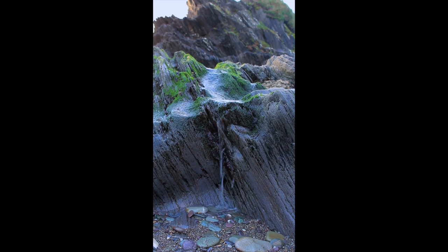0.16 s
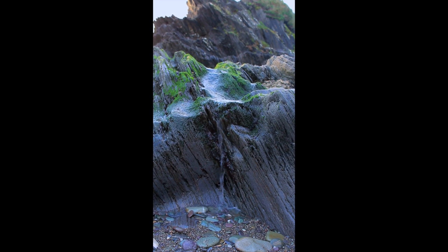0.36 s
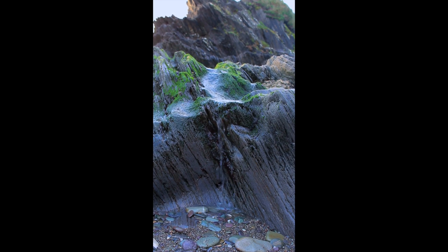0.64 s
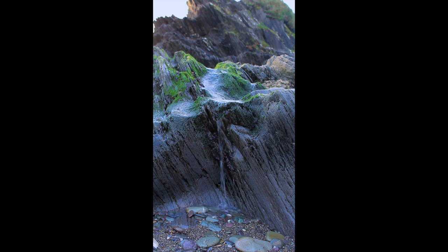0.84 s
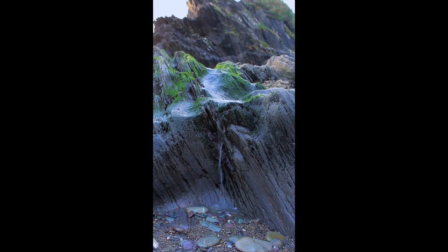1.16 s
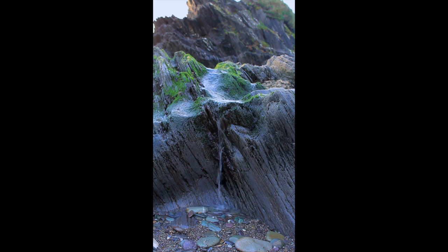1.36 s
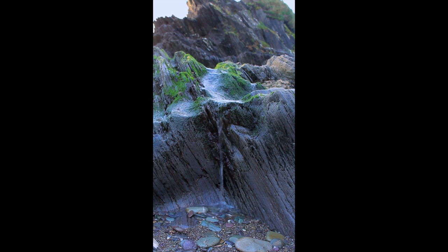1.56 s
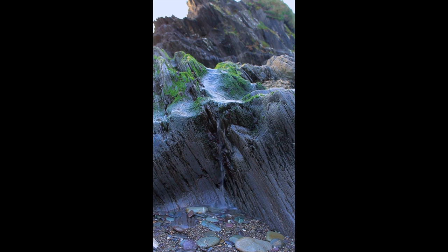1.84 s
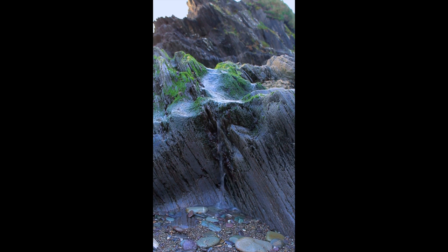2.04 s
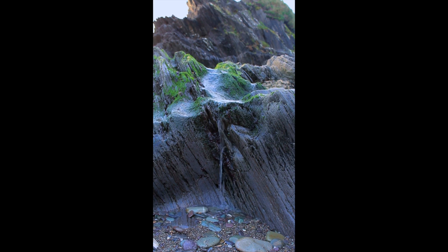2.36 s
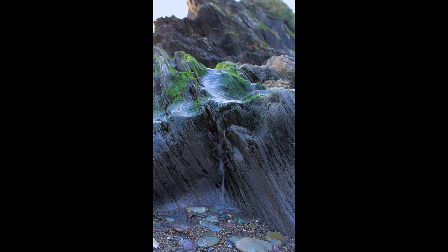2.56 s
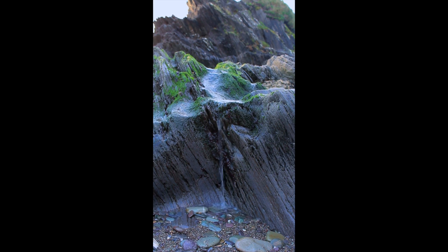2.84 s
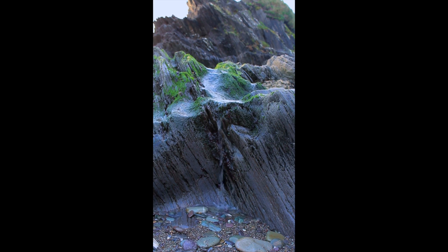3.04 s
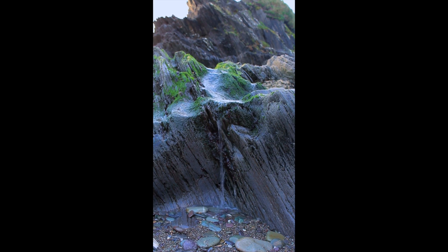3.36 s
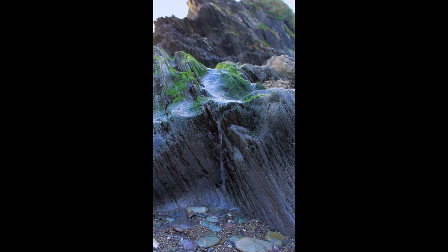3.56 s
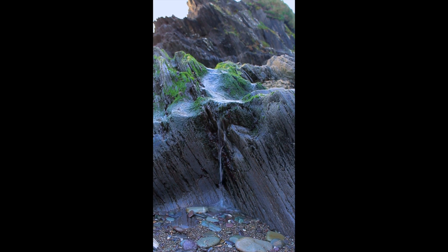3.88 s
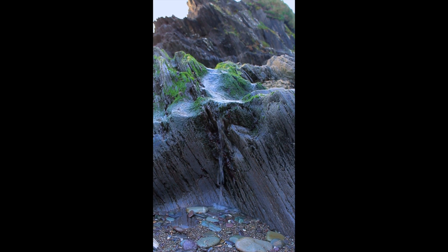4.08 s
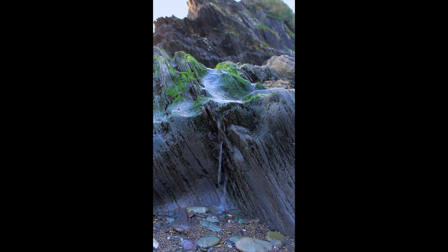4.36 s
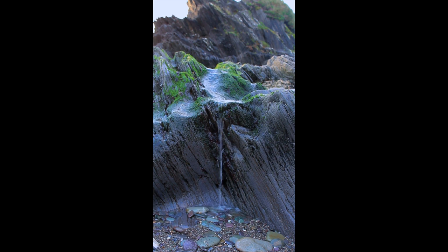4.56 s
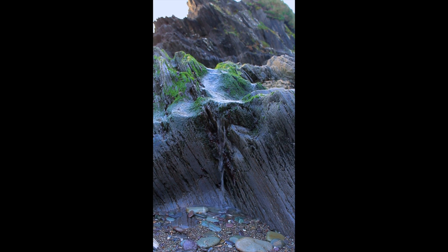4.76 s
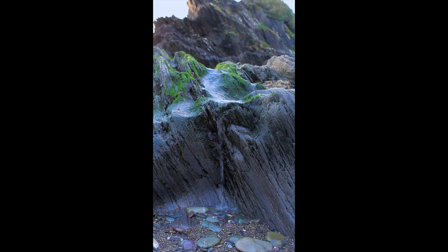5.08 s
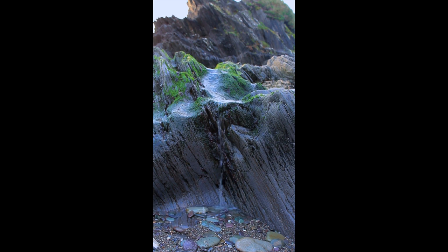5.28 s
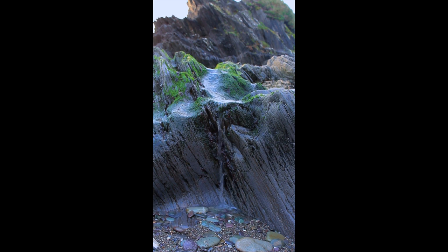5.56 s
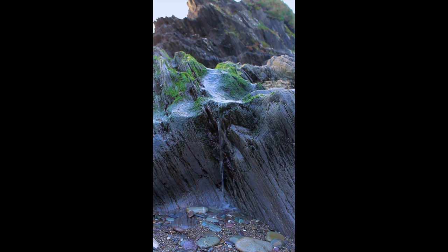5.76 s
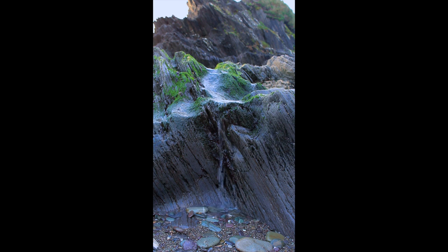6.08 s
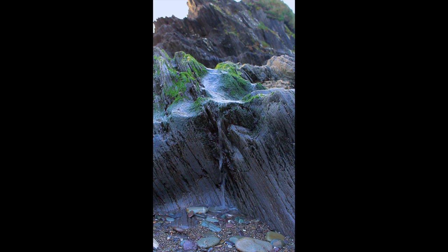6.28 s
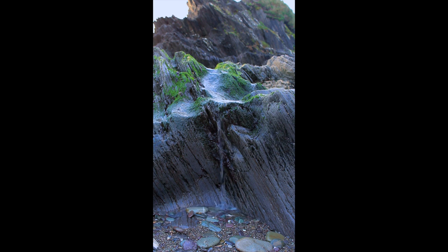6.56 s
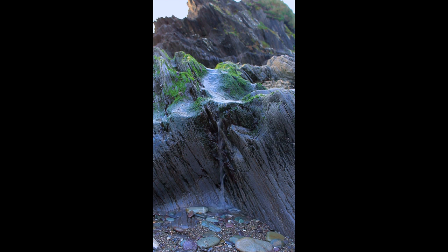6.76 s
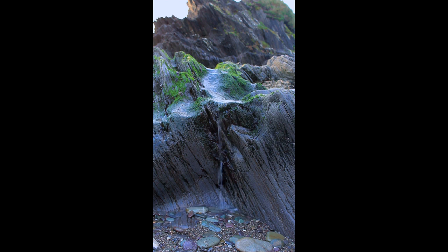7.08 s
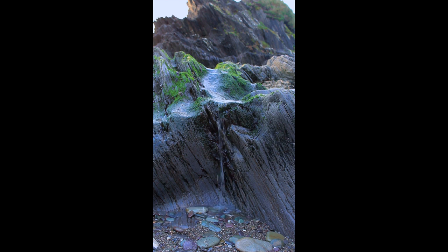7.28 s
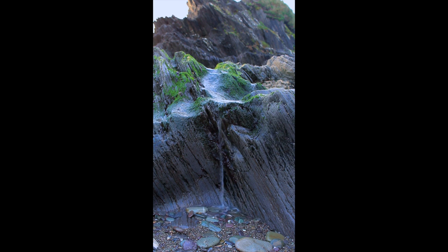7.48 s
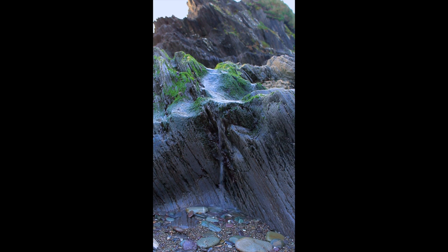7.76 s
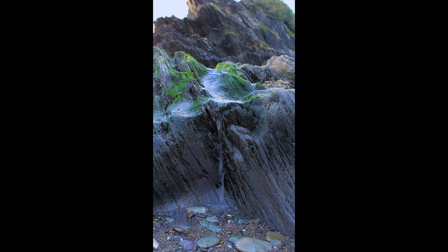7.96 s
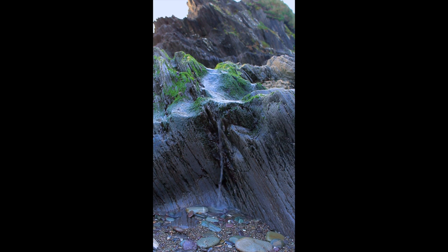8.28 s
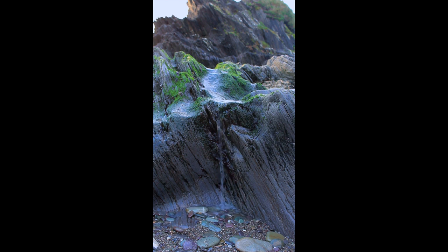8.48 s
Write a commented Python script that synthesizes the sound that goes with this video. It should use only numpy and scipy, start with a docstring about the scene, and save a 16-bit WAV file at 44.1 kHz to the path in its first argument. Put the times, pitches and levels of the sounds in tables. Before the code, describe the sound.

A thin trickle falls down a rock face and spatters on wet pebbles close to the microphone. Irregular, rapid bright plinks and clicks overlap with fine fizzing spray and a very short echo from the rock hollow. Distant surf rumbles softly behind, gradually fading. Around seven seconds pebbles grind and knock nearby for about a second, while the dripping carries on to the end.

```python
"""On a pebble beach, a thin stream runs down a rock face and spatters on wet pebbles close to one microphone.
Each drop traps tiny bubbles, made as short ringing tones; the hollow under the rock throws them back as a tail.
Every landing adds a snap of hiss and a short spray of tiny rings, over a finer spatter.
Surf, made of random spectra, rumbles far off along the beach.
Once the pebbles grind and shift nearby, as crowds of short knocks."""
import sys
import numpy as np
from scipy import signal
from scipy.fft import rfft, irfft
from scipy.io import wavfile
from scipy.ndimage import uniform_filter1d

SR = 44100
rng = np.random.default_rng(int(sys.argv[2]) if len(sys.argv) > 2 else 0)


def transcribe(signal):
    """Save signal, clipped to [-1, 1], as a 16-bit WAV file at the path in sys.argv[1]."""
    frames = np.atleast_2d(signal).T
    limited = np.clip(frames, -1, 1)
    pcm = np.round(limited * 32767).astype(np.int16)
    wavfile.write(sys.argv[1], SR, pcm)


def to_linear_factor(level_db):
    """Convert decibel levels (scalar or array-like) to linear amplitude factors."""
    exponent = np.asarray(level_db, float) / 20
    return 10 ** exponent


N = 380583

# The clearest drops, each with two bubbles and a spray; levels are relative, before the trims in the functions:
# (time of the peak [s], main bubble's level [dB], its pitch [Hz],
#  second bubble's level [dB], its pitch [Hz], level of the spray after it [dB])
DROP_LANDINGS = [(0.0063, -18, 5600, -27, 3920, -36), (0.032, -14, 10400, -45, 7140, -49),
                 (0.0826, -17.5, 5170, -30, 3430, -36), (0.095, -26, 2410, -30, 3000, -41),
                 (0.0999, -15, 6930, -28, 2410, -46), (0.1584, -18, 2500, -34, 6900, -58),
                 (0.259, -20, 7200, -30, 8900, -31), (0.278, -16, 4120, -30, 8010, -28),
                 (0.302, -16, 4200, -17, 5500, -46), (0.3084, -11.5, 3800, -34, 6000, -50),
                 (0.3307, -9, 4170, -14.5, 5560, -48), (0.3764, -19, 8060, -31, 4500, -39),
                 (0.4, -19, 4300, -21, 3510, -42), (0.4087, -11.5, 6870, -21, 3500, -39),
                 (0.417, -7, 4150, -26, 7140, -49), (0.4604, -7.5, 3290, -9.5, 4670, -30),
                 (0.4994, -20, 2100, -33, 3400, -33.5), (0.6012, -18, 6600, -18, 9460, -28.5),
                 (0.6666, -10, 4410, -15, 10070, -33), (0.6824, -18.5, 2820, -25, 3630, -46),
                 (0.7527, -16, 10200, -20.5, 4580, -34), (0.7975, -12.5, 6570, -21, 4470, -30),
                 (0.9014, -12.5, 3500, -44, 2070, -61), (0.9969, -23, 9940, -25, 7950, -42),
                 (1.0959, -15.5, 5860, -19, 3530, -38), (1.2, -14, 4160, -29, 5270, -44),
                 (1.2444, -17, 11150, -30, 6680, -33), (1.2603, -15, 6900, -24, 9430, -48),
                 (1.3251, -20, 9300, -29, 11610, -44), (1.338, -16, 5530, -20, 9800, -33),
                 (1.4156, -17.5, 9800, -39, 5610, -39), (1.473, -9.5, 3520, -37, 6200, -58),
                 (1.5058, -11, 6480, -14, 4030, -49), (1.5376, -18.5, 6550, -18, 11460, -28),
                 (1.5569, -23, 3780, -32, 5310, -46), (1.5745, -18, 6230, -16, 8700, -31),
                 (1.5906, -21, 2730, -23, 2040, -49), (1.6024, -11, 3480, -19, 4700, -49),
                 (1.6372, -16, 3700, -18.5, 4600, -53), (1.6869, -22, 4240, -28, 9980, -30),
                 (1.6995, -19.5, 4510, -25, 6910, -33), (1.7145, -20, 2230, -25, 8000, -32),
                 (1.7475, -19, 3570, -32, 7500, -46), (1.7738, -11, 2950, -22, 5900, -28),
                 (1.7856, -18, 5840, -24, 2850, -31), (1.7964, -18.5, 6700, -17, 2810, -27),
                 (1.835, -10.5, 4420, -19, 7480, -30), (1.8527, -24, 4300, -24, 5850, -49),
                 (1.92, -20, 5800, -24, 9100, -33), (1.935, -24, 4200, -20, 6600, -28),
                 (1.942, -24, 5620, -31, 3530, -37), (1.9552, -23, 6730, -21, 5490, -35),
                 (1.9745, -17, 4340, -18, 8490, -30), (1.981, -11, 5680, -9, 4610, -47),
                 (2.004, -24, 4450, -18, 2520, -54), (2.013, -10.5, 3320, -32, 4820, -53),
                 (2.0275, -9, 4150, -8, 5940, -21), (2.0427, -20, 5270, -24, 3520, -50),
                 (2.0789, -24, 6290, -32, 4300, -54), (2.105, -24, 4310, -30, 6000, -25.5),
                 (2.113, -9, 4650, -18, 9400, -41), (2.1292, -23, 9100, -26, 4390, -35),
                 (2.138, -16, 3960, -25, 7240, -55), (2.179, -18, 6560, -27, 4320, -46),
                 (2.1979, -21, 4790, -25, 3540, -50), (2.2339, -19, 2720, -25, 9140, -34),
                 (2.291, -9, 4260, -13, 3300, -36), (2.311, -16, 3970, -18, 2950, -37),
                 (2.3342, -13, 3530, -13, 9100, -33), (2.3403, -10.5, 3770, -8, 4710, -48),
                 (2.363, -8.5, 3920, -28, 2340, -44), (2.3913, -11, 9690, -13.5, 5520, -41),
                 (2.4062, -20, 4430, -32, 5750, -45), (2.4353, -21, 7200, -30, 3290, -46),
                 (2.4438, -15.5, 4430, -35, 2350, -47), (2.458, -16, 7010, -24, 9000, -38),
                 (2.4782, -21, 3910, -18, 10680, -37), (2.4914, -14.5, 4220, -16, 5450, -33),
                 (2.5039, -8.5, 9270, -22, 4160, -43), (2.5484, -21, 7680, -36, 2530, -44),
                 (2.556, -8, 3970, -25, 6760, -53), (2.7403, -6.5, 6650, -20.5, 8740, -21.5),
                 (2.7703, -8.5, 3520, -16, 7150, -29), (2.7948, -15, 3500, -18, 4160, -39),
                 (2.8646, -13.5, 5870, -20, 7630, -30), (2.8917, -18.5, 2060, -33, 4150, -30),
                 (2.9111, -15, 4730, -20, 8680, -34), (2.9334, -17, 5800, -29, 4510, -40),
                 (2.9487, -6.5, 4700, -14.5, 6450, -52), (2.9658, -20, 4570, -27, 8800, -59),
                 (2.9866, -17.5, 8200, -17.5, 4430, -50), (3.0088, -14, 4190, -12.5, 5790, -49),
                 (3.094, -12, 3600, -13, 6330, -46), (3.1451, -4, 3300, -19, 4280, -35),
                 (3.2051, -25, 2440, -33, 3530, -55), (3.2511, -14, 5770, -37, 7900, -50),
                 (3.2868, -10, 5850, -21, 4590, -54), (3.3, -19, 2080, -33, 5660, -41),
                 (3.3296, -14.5, 2030, -22, 2590, -36), (3.349, -10.5, 6900, -24, 4360, -37),
                 (3.385, -13.5, 7070, -16, 4100, -38), (3.3893, -14.5, 2070, -21, 7210, -51),
                 (3.441, -11, 3800, -21, 6550, -29), (3.499, -14, 3960, -21, 6840, -27),
                 (3.5152, -14, 5400, -18, 6990, -28), (3.535, -15.5, 1980, -21, 4490, -49),
                 (3.549, -25, 2550, -28, 1780, -44), (3.5527, -6, 7150, -25, 5700, -37),
                 (3.569, -16, 6920, -32, 9150, -41), (3.5907, -18.5, 9000, -23, 3110, -31),
                 (3.6034, -9.5, 3670, -23.5, 5500, -45), (3.6146, -18, 2110, -28, 2770, -50),
                 (3.6204, -16, 2350, -28, 5500, -53), (3.7033, -17.5, 1960, -26, 6830, -35),
                 (3.7256, -21, 9280, -19, 7000, -40), (3.7422, -12.5, 4170, -14, 5960, -44),
                 (3.8027, -7.5, 3270, -11, 4130, -37), (3.8163, -10, 6020, -21, 3570, -43),
                 (3.8844, -4, 3390, -35, 5870, -58), (3.9264, -9, 4200, -18, 7770, -23),
                 (3.9355, -19, 4360, -20, 8200, -45), (3.956, -16, 4270, -32, 5760, -41),
                 (3.971, -4.5, 3960, -14, 4950, -33), (3.9767, -5, 3840, -27, 5470, -42),
                 (3.999, -23, 4050, -33, 6590, -34), (4.0438, -21.5, 6900, -21, 10620, -46),
                 (4.1113, -12, 3390, -27, 2090, -50), (4.1479, -16, 3100, -27.5, 4080, -32),
                 (4.1764, -22, 5200, -16, 10800, -37), (4.1868, -11.5, 6650, -14, 4980, -37),
                 (4.2223, -15, 9200, -27, 6510, -32), (4.2477, -7.5, 4100, -13.5, 8070, -19),
                 (4.267, -13.5, 6460, -25, 10680, -43), (4.3333, -8, 3920, -30, 11400, -37),
                 (4.3657, -20.5, 2400, -36, 4330, -58), (4.402, -14, 7500, -29, 9500, -48),
                 (4.45, -20, 4200, -22, 9150, -32), (4.4987, -14.5, 4390, -24, 5780, -28),
                 (4.521, -14, 4160, -18, 8600, -37), (4.5395, -21, 5040, -25, 10800, -44),
                 (4.5533, -28, 4390, -42, 7050, -52), (4.577, -23, 4290, -36, 8660, -50),
                 (4.5924, -22, 6230, -35, 10900, -39), (4.6355, -25, 4940, -26, 6740, -46),
                 (4.6536, -25, 7030, -25, 4200, -28), (4.6695, -7, 4070, -25, 7400, -29),
                 (4.7109, -10.5, 6960, -29, 4890, -48), (4.7253, -9, 3420, -17, 4470, -47),
                 (4.7354, -15, 6260, -14, 4200, -50), (4.751, -22, 6730, -17, 3970, -51),
                 (4.821, -7, 3670, -19.5, 7000, -54), (4.8819, -19, 4720, -37, 6870, -50),
                 (4.8886, -11, 4710, -11, 3810, -51), (4.9073, -16.5, 4100, -35, 1770, -49),
                 (4.9785, -20, 7180, -31, 11200, -31), (5.0096, -24, 9130, -23, 4770, -44),
                 (5.029, -18, 8500, -18, 7010, -34), (5.051, -9.5, 3800, -15, 6900, -25),
                 (5.0775, -18, 4210, -33, 7080, -45), (5.106, -10.5, 4500, -22, 10100, -44),
                 (5.1212, -13, 4200, -19, 8640, -37), (5.1381, -23, 6990, -36, 9570, -49),
                 (5.153, -21, 2870, -21, 7100, -35), (5.1955, -14.5, 6900, -22, 10700, -24.5),
                 (5.2101, -20.5, 4060, -25, 5560, -57), (5.2768, -23, 7550, -26, 3900, -34),
                 (5.3036, -14.5, 2940, -17, 6700, -32), (5.373, -23, 4800, -31, 6550, -34),
                 (5.4035, -18.5, 6340, -20, 8600, -38), (5.5242, -16.5, 5520, -26, 7020, -51),
                 (5.5423, -9, 4770, -40, 10620, -31), (5.5518, -15, 4320, -15, 5680, -31),
                 (5.5614, -16, 5350, -24, 6750, -52), (5.596, -14.5, 6470, -18.5, 4250, -25),
                 (5.6207, -19, 7000, -25, 5600, -37), (5.645, -10.5, 4070, -19, 7720, -39),
                 (5.674, -7.5, 3330, -13, 8860, -33), (5.6845, -17, 5600, -20, 3540, -54),
                 (5.7212, -21, 4230, -33, 5710, -54), (5.7686, -20, 10700, -17, 6950, -44),
                 (5.7755, -17, 5100, -28, 8850, -40), (5.7974, -13.5, 6610, -21, 9770, -44),
                 (5.8043, -19, 8000, -29, 4970, -46), (5.8112, -15, 7160, -31, 4760, -52),
                 (5.8395, -20, 7060, -35, 4170, -39), (5.8665, -24, 7210, -26, 9000, -28),
                 (5.8915, -20, 5740, -21, 4300, -39), (5.9378, -16, 4600, -31, 1830, -42),
                 (5.9533, -12.5, 5480, -14.5, 6940, -24.5), (5.9981, -16, 7130, -35, 1830, -44),
                 (6.013, -18, 4140, -22, 7100, -31), (6.0837, -19.5, 3680, -33, 1950, -60),
                 (6.123, -19, 11500, -20, 4050, -54), (6.1391, -8, 3680, -19, 7970, -50),
                 (6.1963, -19, 2720, -31, 6660, -30), (6.2266, -15.5, 4000, -16, 5030, -23),
                 (6.2633, -18, 4060, -31, 5620, -43), (6.327, -12, 3540, -14.5, 4700, -32),
                 (6.3343, -18.5, 4100, -32, 5700, -48), (6.419, -14, 4350, -29, 1780, -63),
                 (6.5, -16, 6400, -18.5, 4600, -39), (6.5156, -19, 6620, -30, 11470, -49),
                 (6.5361, -15.5, 7470, -18, 11800, -43), (6.555, -12.5, 7400, -32, 3200, -39),
                 (6.5917, -14, 7360, -28, 4290, -28), (6.5978, -14.5, 5780, -11.5, 9300, -29),
                 (6.6625, -24, 2530, -29, 3510, -36), (6.68, -5.5, 4770, -25, 10300, -32),
                 (6.6867, -14.5, 6600, -19, 3540, -51), (6.708, -18, 6260, -31, 2850, -48),
                 (6.761, -18, 4350, -28, 7160, -47), (6.7872, -12, 6020, -23, 3500, -45),
                 (6.8061, -17, 10900, -25, 8800, -49), (6.8178, -23, 5440, -20, 2800, -40),
                 (6.8234, -7, 4900, -23, 3680, -40), (6.8456, -16, 10100, -32, 4700, -25),
                 (6.8622, -17, 4320, -11, 7350, -27), (6.89, -9, 4500, -17, 5960, -37),
                 (6.9027, -16, 5650, -23, 8560, -30), (6.9305, -17, 9150, -18, 6920, -35),
                 (6.9436, -11.5, 3380, -41, 6860, -49), (6.9996, -8, 4480, -13, 3600, -25.5),
                 (7.0184, -13, 3500, -16, 4800, -29), (7.0394, -26, 3740, -26, 10330, -36),
                 (7.136, -16, 4100, -33, 6840, -31), (7.1613, -12, 4880, -16, 8700, -27),
                 (7.1744, -18, 4960, -15, 3430, -35), (7.1823, -5, 3600, -20, 5150, -33),
                 (7.2253, -9, 3520, -18.5, 10300, -21), (7.2523, -16.5, 5900, -22, 3430, -35),
                 (7.2797, -16, 4470, -27, 6760, -33), (7.296, -21, 10300, -22, 5180, -33),
                 (7.3086, -18, 10000, -20, 6100, -29), (7.3325, -18, 7500, -23, 4440, -28),
                 (7.3447, -23, 5540, -30, 7450, -26), (7.4112, -6.5, 5300, -17, 3650, -33),
                 (7.4193, -21, 5350, -19, 3750, -39), (7.4285, -20, 5180, -18, 4100, -41),
                 (7.4417, -16, 4500, -13.5, 3340, -31), (7.46, -9, 6280, -26, 4520, -28),
                 (7.5061, -19, 4760, -27, 3440, -43), (7.514, -21, 5670, -25, 8270, -31),
                 (7.5359, -22, 3730, -24, 8860, -42), (7.5498, -14, 3820, -26, 5080, -44),
                 (7.5797, -24, 7310, -22, 4100, -46), (7.6232, -14, 8770, -26, 5820, -42),
                 (7.6798, -19.5, 7630, -28.5, 5960, -36), (7.7166, -23, 4150, -26, 6900, -43),
                 (7.7509, -13, 7670, -23.5, 5960, -31), (7.7888, -7, 9260, -29, 7300, -48),
                 (7.9818, -13, 3880, -15.5, 2010, -55), (8.0103, -17, 9550, -19, 6800, -38),
                 (8.021, -11, 6950, -29, 3700, -26), (8.041, -23, 2050, -35, 3560, -55),
                 (8.0587, -18, 2170, -28, 3530, -44), (8.075, -16, 6650, -17, 1880, -34),
                 (8.0855, -10.5, 4320, -17, 6750, -27), (8.101, -22, 2300, -18, 1640, -46),
                 (8.1231, -22, 2360, -33, 3970, -54), (8.152, -32, 2290, -35, 1670, -43),
                 (8.163, -19, 7240, -19.5, 4330, -28), (8.216, -20, 4200, -23, 5500, -37),
                 (8.2773, -20, 1860, -23, 7110, -33), (8.2934, -12.5, 9700, -24, 7200, -34),
                 (8.3435, -18, 7000, -31, 2150, -45), (8.379, -26, 2420, -26, 8930, -50),
                 (8.4761, -6.5, 4100, -15, 5350, -43), (8.513, -17, 4050, -31, 2930, -53),
                 (8.5227, -17, 9100, -25, 3960, -52), (8.557, -23.5, 3940, -26, 10330, -43),
                 (8.5735, -9, 4570, -16.5, 8700, -50), (8.6064, -6.5, 3780, -35, 2680, -52),
                 (8.6127, -10, 3780, -21, 4740, -44)]


def evened(x):
    """Scales a sound to an rms (average strength) of 1."""
    return x / np.sqrt(np.mean(x ** 2) + 1e-20)


def read(points, hz):
    """Reads a spectrum table at the given frequencies, on a log-frequency axis."""
    f, value = np.transpose(points)
    return np.interp(np.log(hz + 1), np.log(f + 1), value)


def level(rows, t, axis=1):
    """Reads one column of a curve at times t, with straight lines between its points."""
    rows = np.asarray(rows)
    return np.interp(t, rows[:, 0], rows[:, axis])


def add(mix, s, sound):
    """Mixes a sound in at s seconds."""
    part = mix[max(round(s * SR), 0):][:len(sound)]
    part += sound[:len(part)]


def ring(hz, cycles, glide, phase):
    """A tone of rising pitch that swells for the given cycles, then dies a little slower; envelope peak 1."""
    # u is time counted in swells: the peak is at 1, the end at 3
    u = np.arange(int(3 * cycles * SR / hz) + 2) * hz / SR / cycles
    envelope = (u * np.exp(1 - u)) ** 2.5
    turns = cycles * u * (1 + glide * (u - 2)) + phase
    return envelope * np.sin(2 * np.pi * turns)


def grains(pitches, per_s, spread_db, ms, glide, count=40):
    """Rings of many pitches, set off at random, a few large; two rows: under and over 1150 Hz. ms: swell time."""
    size = to_linear_factor(spread_db * np.minimum(rng.exponential(1, N), 4))
    size = size * (rng.random(N) < per_s / SR)  # zero where no ring starts
    which = rng.integers(0, count, N)
    phase = rng.random(count)
    out = np.zeros((2, N))
    for k, hz in enumerate(np.geomspace(pitches[0][0], pitches[-1][0], count)):
        tone = to_linear_factor(read(pitches, hz)) * ring(hz, ms * hz / 1000, glide, phase[k])
        starts = np.flatnonzero(size * (which == k))
        places = starts[:, None] + np.arange(len(tone))
        copies = np.outer(size[starts], tone)
        out[int(hz > 1150)] += np.bincount(places.ravel(), copies.ravel(), N)[:N]
    return evened(out)


def lumps(per_s, ms):
    """An uneven envelope of rms 1: random bursts that start suddenly and die away."""
    starts = rng.exponential(1, N) * (rng.random(N) < per_s / SR)
    return evened(signal.lfilter([1], [1, -np.exp(-1000 / (ms * SR))], starts))


def drops():
    """Each drop rings two bubbles, and each sheds two weaker ones; also marks the landings by strength."""
    bubbles = []
    for s, *pair, spray in DROP_LANDINGS:
        for db, hz in (pair[:2], pair[2:]):
            bubbles.append((s, db, hz))
    out, landings = np.zeros(N), np.zeros(N)
    chance = rng.random((len(bubbles), 3, 4))
    for (s, db, hz), family in zip(bubbles, chance):
        rise = np.clip(.0011 - .00003 * (db + 9.5), .0004, .003)  # seconds; hard hits burst sooner
        add(landings, s - rise, to_linear_factor([0.93 * db]))  # louder bubbles splash more, but not in proportion
        for k, (turn, size, late, off) in enumerate(family):
            shed = min(k, 1)  # 0 for the bubble itself, 1 for the two it sheds
            pitch_hz = hz * (1 + 0.31 * shed * (off - .5))
            span = rise * (0.82 + .3 * size)  # swell time in seconds
            weaker_db = shed * (13.5 + 3.7 * size)
            delay = shed * (0.0049 + 0.026 * late)
            tone = to_linear_factor(db - 0.42 - weaker_db) * ring(pitch_hz, span * pitch_hz, glide=0.014, phase=turn)
            add(out, s - span + delay, tone)
    return out, landings


def splash(landings):
    """A broad snap of hiss as each drop bursts on stone, dying within a few milliseconds."""
    # colour of the hiss: (frequency [Hz], relative level [dB per Hz])
    splash_colour = [(1500, 6), (2800, -9.5), (4500, 5), (7000, -7), (10000, -3), (12500, -11.5),
                     (15500, -35)]
    t = np.arange(SR // 20) / SR
    snap = np.minimum(t / 0.001, 1) * to_linear_factor(-60 * t / 0.018)  # 1 ms rise, 60 dB down by 18 ms
    burst = signal.oaconvolve(landings, snap)[:N]
    colour = to_linear_factor(read(splash_colour, np.fft.rfftfreq(N, 1 / SR)))
    hiss = irfft(rfft(rng.standard_normal(N)) * colour, N)
    return to_linear_factor(-17.0) * burst * evened(hiss)


def spatter(landings):
    """Fine fizz around the clear drops and in each spray, and small separate drips between them."""
    # fine spatter between the clear drops, before the 3 dB cut and the mixing weights: (time [s], level [dB])
    spatter_curve = [(0.0, -42.5), (0.88, -44), (1.2, -38), (1.45, -46.5), (1.7, -43.5), (2.5, -40.5),
                     (2.95, -45), (3.6, -45.5), (4.3, -46), (4.55, -40), (5.4, -42.5), (6.35, -44),
                     (6.6, -41), (7.3, -42), (7.73, -40.5), (7.82, -53), (7.88, -42.5), (8.05, -42.5),
                     (8.63, -41)]
    # loudness of spatter bubbles by pitch: (pitch [Hz], relative level [dB])
    bubble_pitches = [(2400, -7), (3300, -3), (4300, 3), (5200, 0.5), (6900, 1.5), (8000, 0), (9500, 1.5),
                      (11500, -4.5), (14000, -20.5)]
    spray_ms, spray_db = 14.4, 3.5  # time to sag to about a third; boost on the drops' spray levels
    drips_db = 3  # boost of the drips
    fizz = grains(bubble_pitches, per_s=3000, spread_db=3.5, ms=0.47, glide=0.0051).sum(0)
    drips = grains(bubble_pitches, per_s=700, spread_db=3.5, ms=2.0, glide=0.01).sum(0)
    # the fizz thickens for a few milliseconds around each landing
    clumps = evened(signal.oaconvolve(landings, signal.windows.hann(round(0.0076 * SR)), "same"))
    sprays = np.zeros(N)
    u = np.arange(round(3 * spray_ms * SR / 1000)) * 1000 / SR / spray_ms
    shape = np.minimum(u / 0.18, 1) * np.exp(-u ** 1.7)  # quick start, sagging end
    for s, *bubbles, db in DROP_LANDINGS:
        add(sprays, s - .003, to_linear_factor(db + spray_db) * shape)
    steady = to_linear_factor(level(spatter_curve, np.arange(N) / SR) - 3.0)
    fizz_envelope = steady * (0.22 + 0.86 * lumps(45, ms=6.4) + 1.0 * clumps) + 0.51 * sprays
    drip_envelope = steady * (0.22 + 0.79 * lumps(60, ms=5.6)) + 0.18 * sprays
    return fizz_envelope * fizz + drip_envelope * to_linear_factor(drips_db) * drips


def hollow(x):
    """Adds a short scattered tail off the rock and stones: fading noise stands for the many echoes."""
    tail_db, fade_s = -10, 0.044  # level of the tail; time to fall by 60 dB
    t = np.arange(SR // 8) / SR
    tail = rng.standard_normal(len(t)) * to_linear_factor(-60 * t / fade_s) * np.minimum(t / 0.0018, 1)
    return x + to_linear_factor(tail_db) * signal.oaconvolve(x, tail / np.linalg.norm(tail))[:N]


def surf():
    """Distant surf: random short-time spectra with soft drifting patches, slowly brightening."""
    # level of the surf, which dips briefly again and again, before a 2.5 dB boost and the brightening:
    # (time [s], level [dB])
    surf_curve = [(0.0, -28), (0.62, -26), (0.84, -27.5), (1.24, -23), (1.37, -26), (1.45, -32),
                  (1.63, -24), (2.1, -28), (2.51, -27), (3.0, -31), (3.15, -27.5), (3.66, -27),
                  (4.03, -31.5), (4.5, -28.5), (5.17, -30.5), (5.41, -30), (5.74, -33), (5.95, -30.5),
                  (6.29, -34.5), (6.51, -31), (6.86, -34), (7.2, -30), (7.7, -34), (7.84, -40), (7.93, -37),
                  (8.13, -33), (8.63, -35)]
    # colour of the surf: (frequency [Hz], relative level [dB per Hz])
    surf_colour = [(35, -58), (70, -71), (115, -6.5), (170, 5), (234, -1.5), (300, 3.5), (480, 1),
                   (744, -3.5), (1450, -9), (1960, -13), (3200, -19), (4200, -22), (5500, -26),
                   (10600, -37), (15000, -53)]
    # dB per octave over the two octaves above 500 Hz: the rumble thins as the wave runs out
    bright_start_db, bright_end_db = -0.78, 1.7
    frames, hz = N // 256 + 5, np.fft.rfftfreq(1024, 1 / SR)
    a, b, patches = rng.standard_normal((frames, 513, 3)).T
    patches = uniform_filter1d(patches, size=14, axis=1)  # smooth in time
    patches = evened(uniform_filter1d(patches, size=10, axis=0))  # smooth in frequency
    octaves = np.clip(np.log2((hz + 1) / 500), 0, 2)[:, None]
    tilt_db = octaves * np.linspace(bright_start_db, bright_end_db, frames)
    spectra = (a + 1j * b) * to_linear_factor(read(surf_colour, hz)[:, None] + 1.18 * patches)
    untilted = signal.istft(spectra, nperseg=1024, noverlap=768)[1]
    scale = np.sqrt(np.mean(untilted ** 2))
    roar = signal.istft(spectra * to_linear_factor(tilt_db), nperseg=1024, noverlap=768)[1][:N] / scale
    return to_linear_factor(level(surf_curve, np.arange(N) / SR) + 2.5) * roar


def pebbles():
    """Stones knock and scrape together: dense short rings under one uneven stroke."""
    # the stroke, before a 0.5 dB cut and the lumps: (time [s], level [dB], small stones over large ones [dB])
    grind_curve = [(6.88, -48, -7), (6.9, -23.5, 1), (6.93, -45, 1), (7.02, -32.5, -8), (7.07, -24.5, -8),
                   (7.12, -33, 0), (7.17, -24, 1), (7.25, -19.5, -0.5), (7.49, -23, 2), (7.55, -23, 5),
                   (7.63, -27.5, 10.5), (7.73, -24.5, 5), (7.79, -19, -5), (7.84, -35, 2), (7.98, -33, -1),
                   (8.12, -36.5, 8), (8.3, -41, 6)]
    # loudness of pebble knocks by pitch: (pitch [Hz], relative level [dB])
    knock_pitches = [(380, -16), (520, -14.5), (800, 5.5), (1100, -3), (1500, 6), (2200, 3.5), (2800, 6.5),
                     (3300, -5.5), (4500, -11.5), (6500, -9)]
    t = np.arange(N) / SR
    inside = (t > grind_curve[0][0]) & (t < grind_curve[-1][0])
    large, small = grains(knock_pitches, per_s=5000, spread_db=2.0, ms=1.65, glide=0.00091)
    tilt = to_linear_factor(level(grind_curve, t, axis=2) / 2)  # half the difference goes to each size
    stroke = to_linear_factor(level(grind_curve, t) - 0.5) * inside * (0.81 + 0.16 * lumps(78, ms=8))
    return stroke * (large / tilt + small * tilt)


def scene():
    """All sources reach the one microphone; only the surf misses the hollow. Both channels are alike."""
    bubbles, landings = drops()
    nearby = bubbles + splash(landings) + spatter(landings) + pebbles()
    mono = hollow(nearby) + surf()
    return np.array([mono, mono])


def band_limit(x):
    """A steep low-pass at the top of the band."""
    return signal.sosfilt(signal.butter(12, 16350, fs=SR, output="sos"), x)


def record(dry):
    """The microphone cuts the deep bass; then a steep filter takes off the highest treble."""
    bass_cut_hz, edge_hz = 162, 15900
    thin = signal.sosfilt(signal.butter(2, bass_cut_hz, "high", fs=SR, output="sos"), dry)
    edge = signal.firwin(255, edge_hz, window=("kaiser", 8), fs=SR)
    mix = signal.oaconvolve(thin, edge[None], "same")
    return band_limit(mix)


dry = scene()
out = record(dry)
transcribe(out)
```